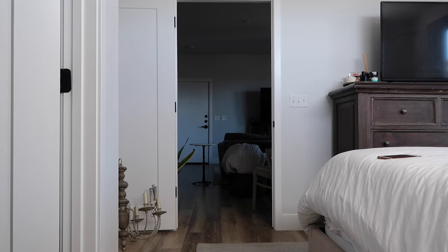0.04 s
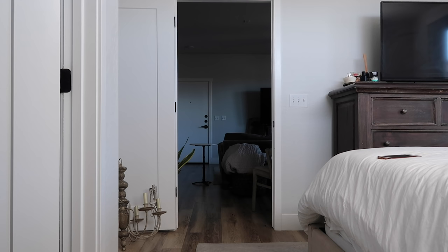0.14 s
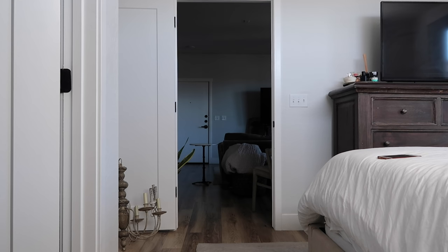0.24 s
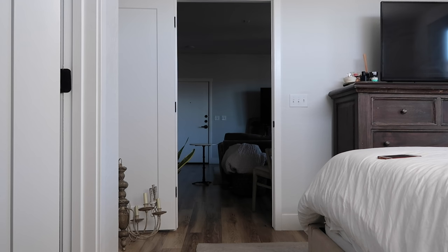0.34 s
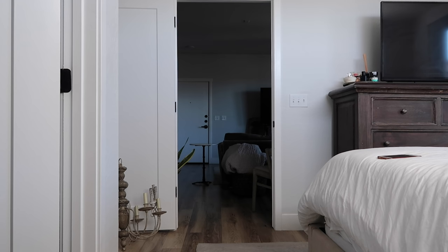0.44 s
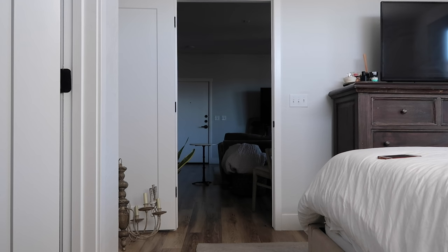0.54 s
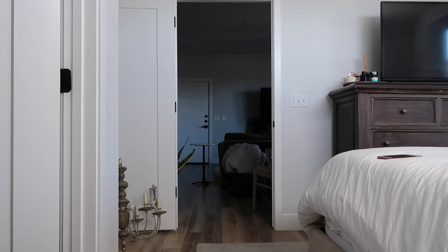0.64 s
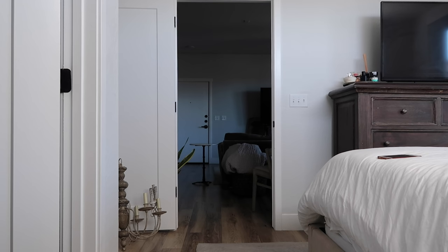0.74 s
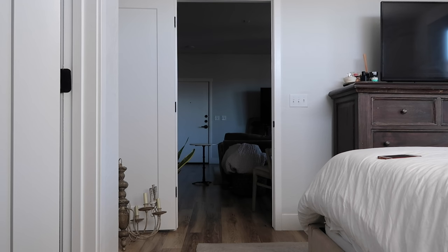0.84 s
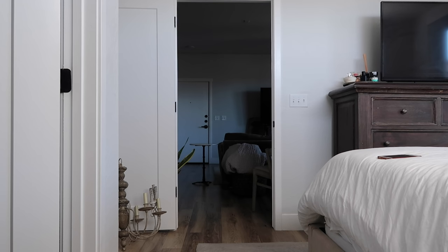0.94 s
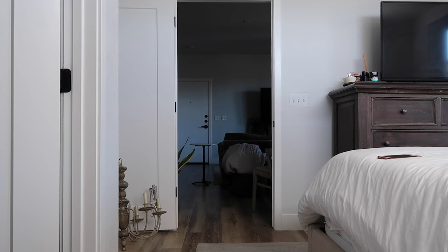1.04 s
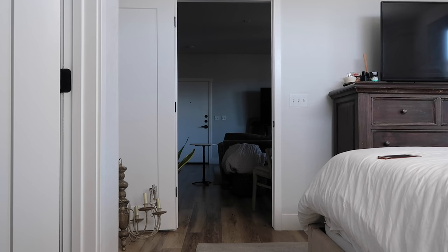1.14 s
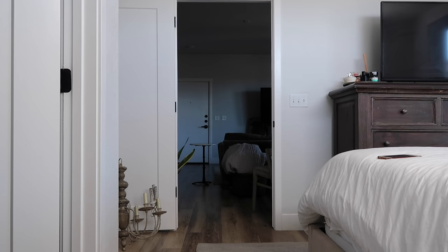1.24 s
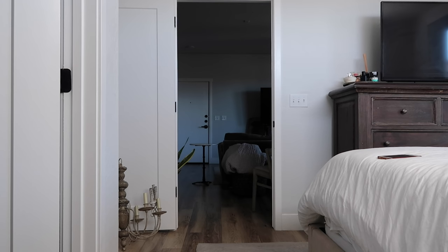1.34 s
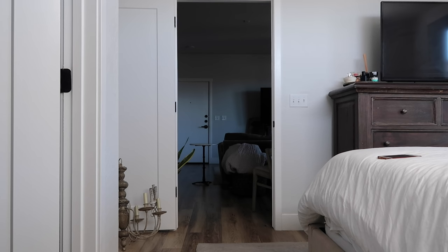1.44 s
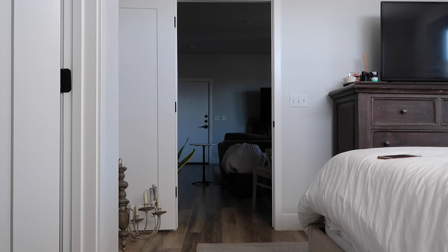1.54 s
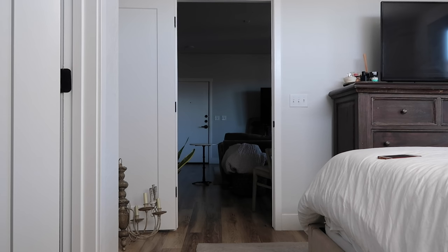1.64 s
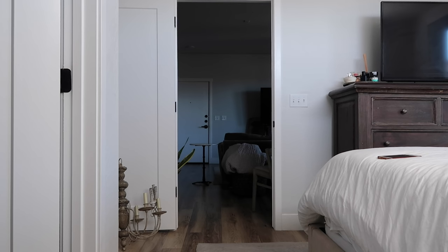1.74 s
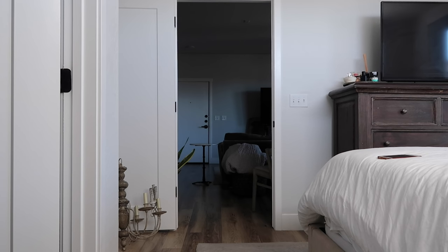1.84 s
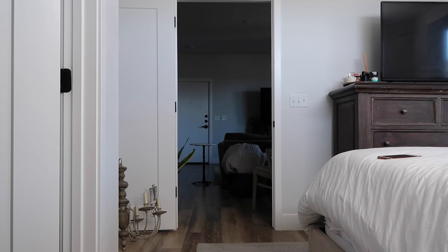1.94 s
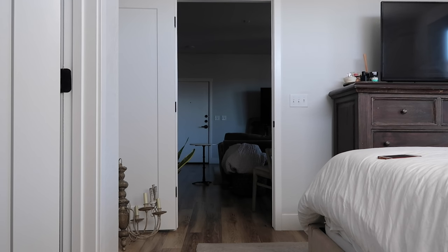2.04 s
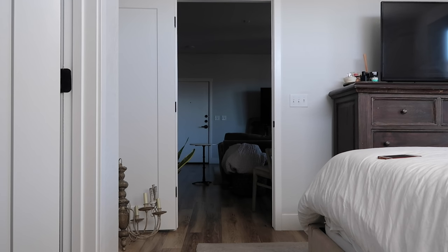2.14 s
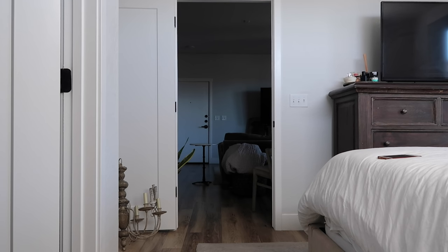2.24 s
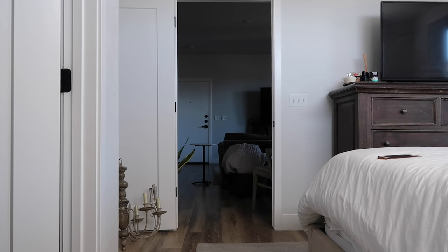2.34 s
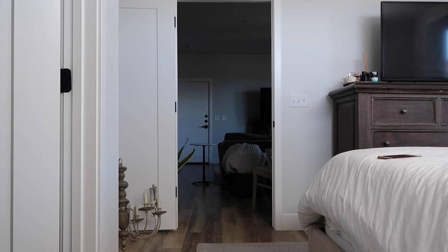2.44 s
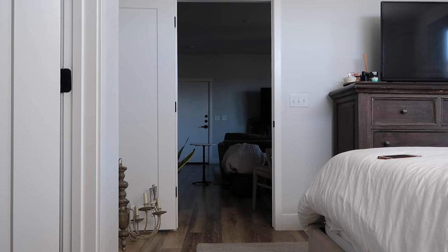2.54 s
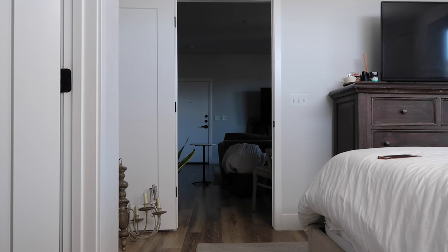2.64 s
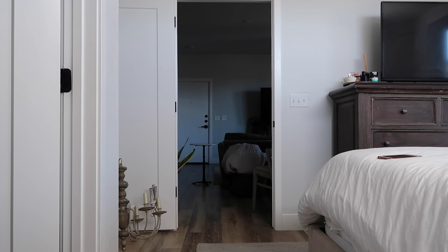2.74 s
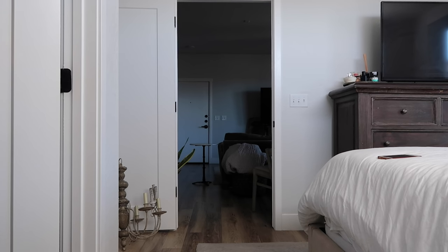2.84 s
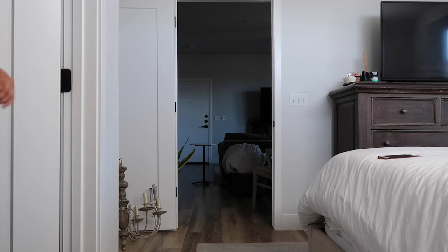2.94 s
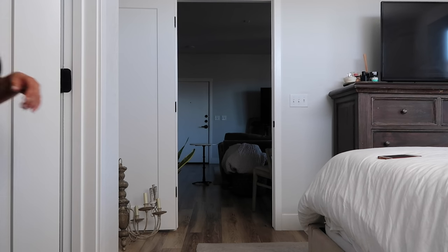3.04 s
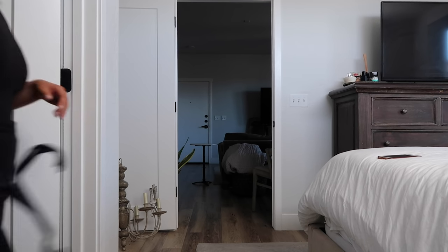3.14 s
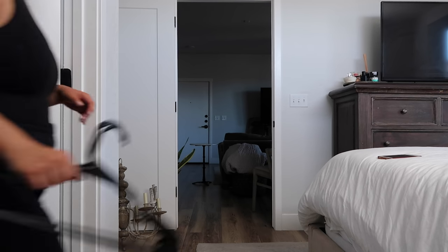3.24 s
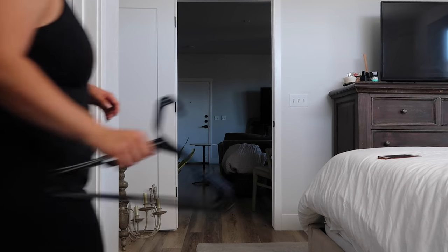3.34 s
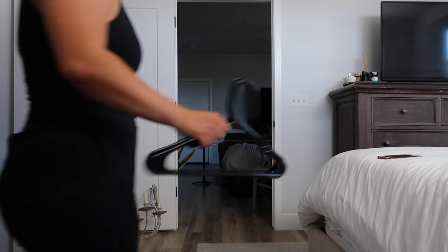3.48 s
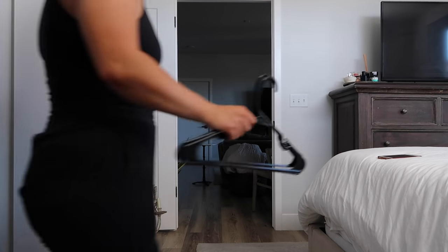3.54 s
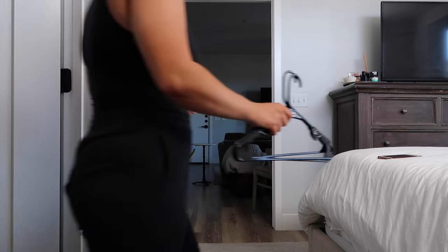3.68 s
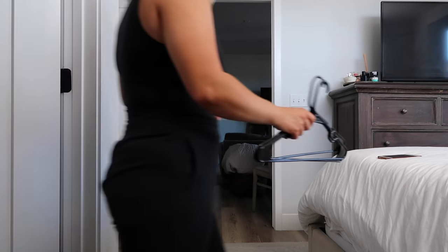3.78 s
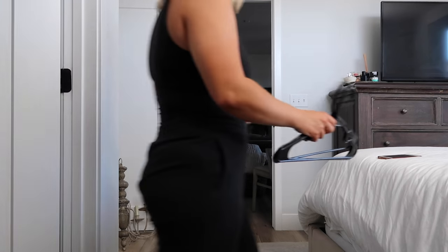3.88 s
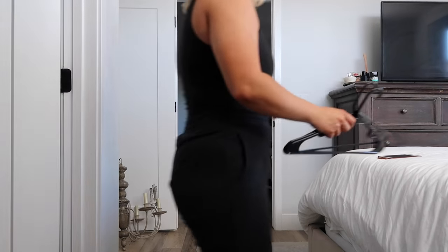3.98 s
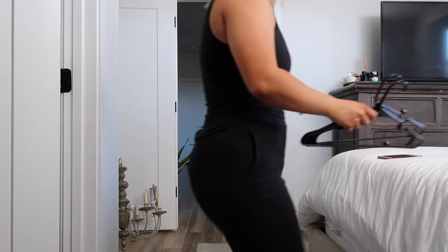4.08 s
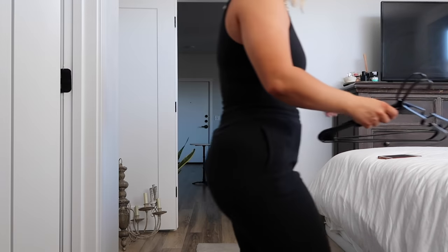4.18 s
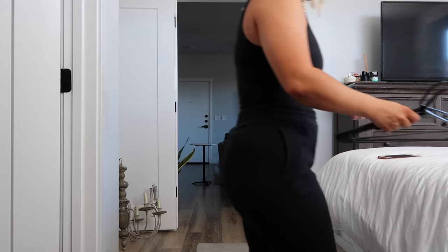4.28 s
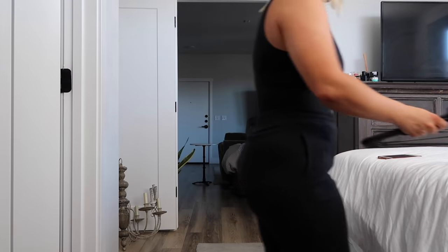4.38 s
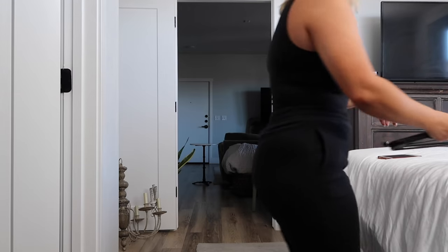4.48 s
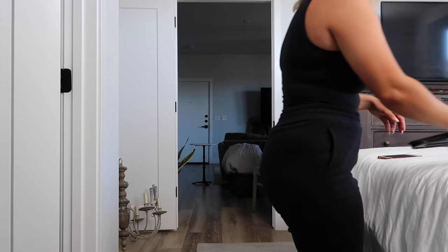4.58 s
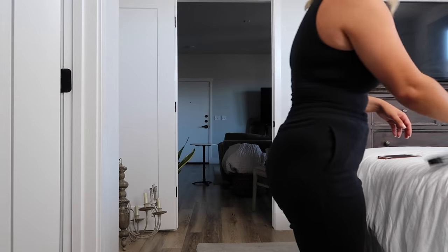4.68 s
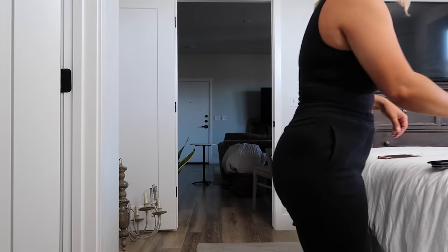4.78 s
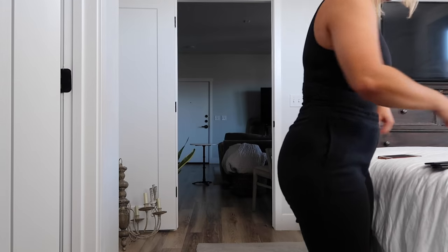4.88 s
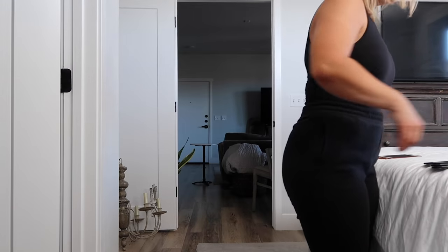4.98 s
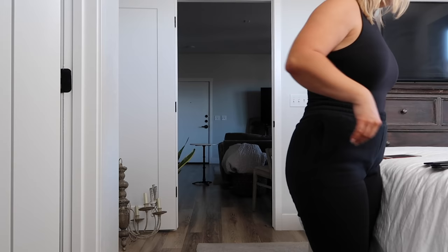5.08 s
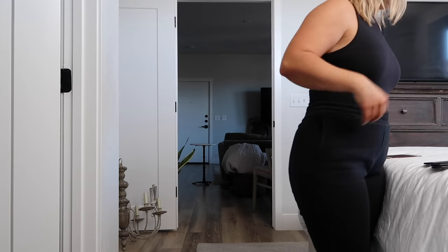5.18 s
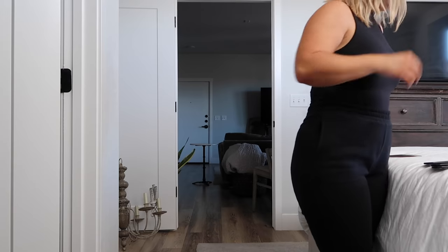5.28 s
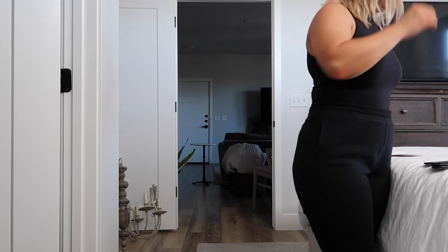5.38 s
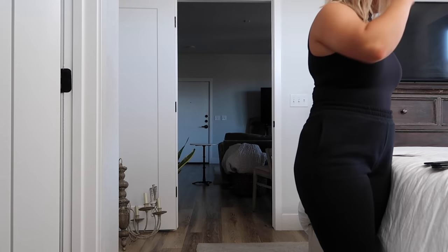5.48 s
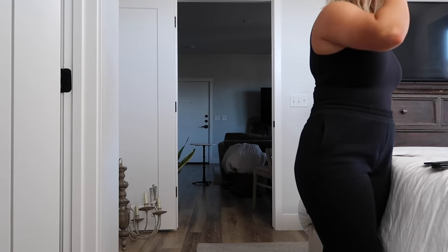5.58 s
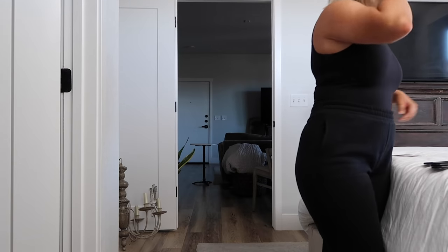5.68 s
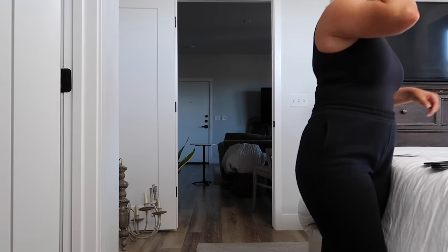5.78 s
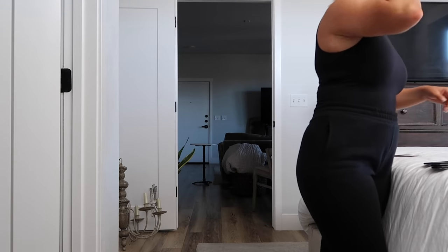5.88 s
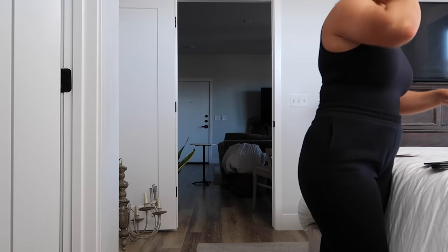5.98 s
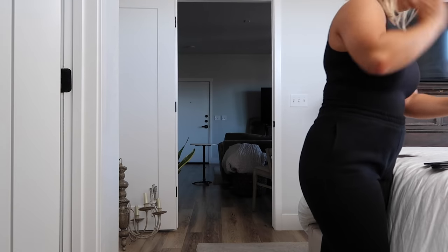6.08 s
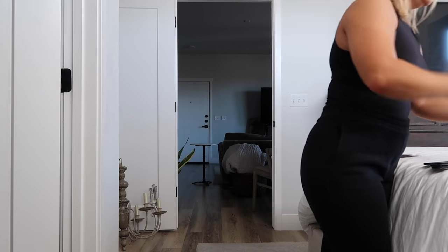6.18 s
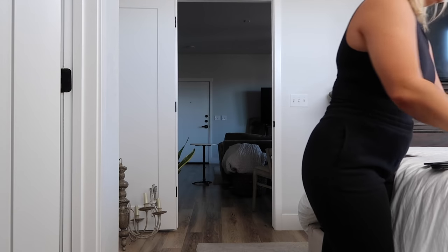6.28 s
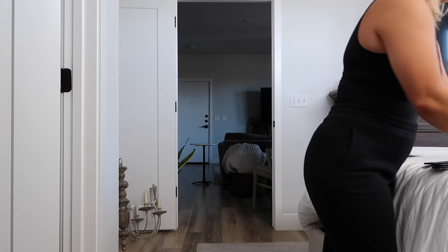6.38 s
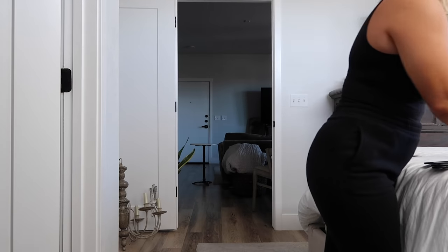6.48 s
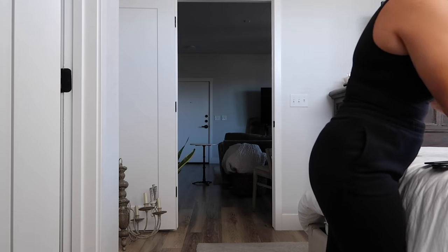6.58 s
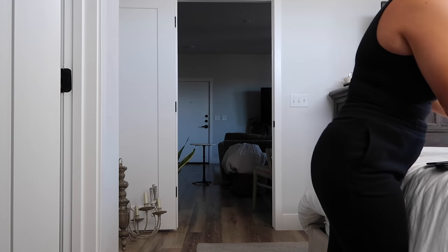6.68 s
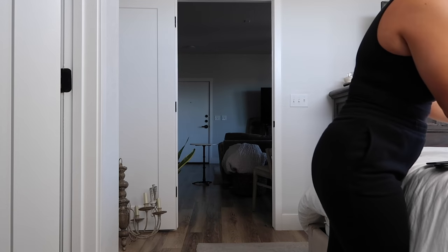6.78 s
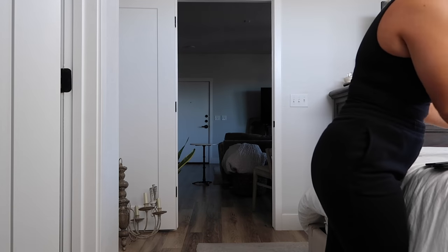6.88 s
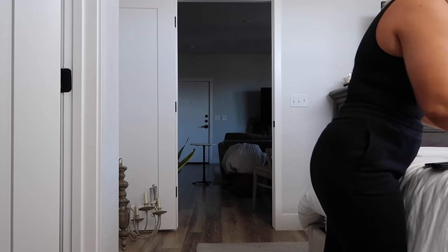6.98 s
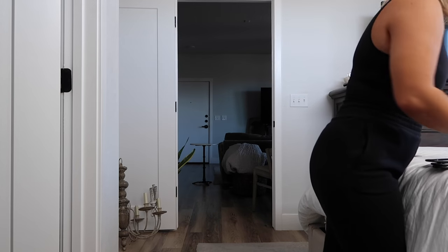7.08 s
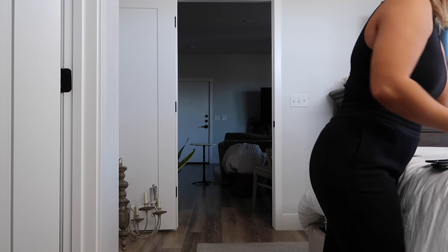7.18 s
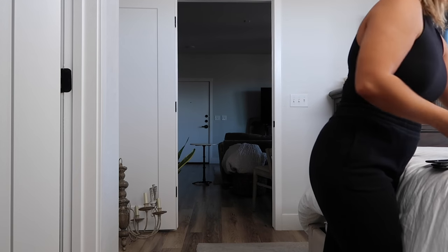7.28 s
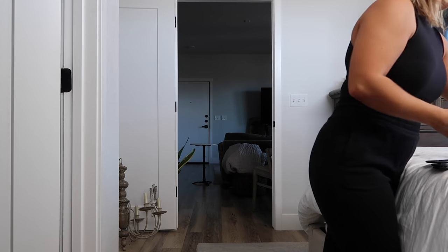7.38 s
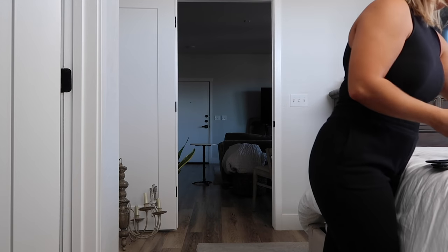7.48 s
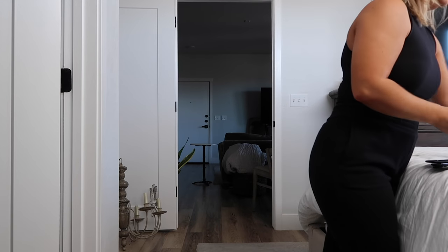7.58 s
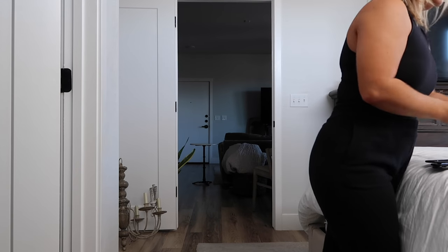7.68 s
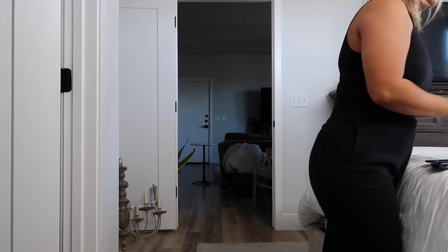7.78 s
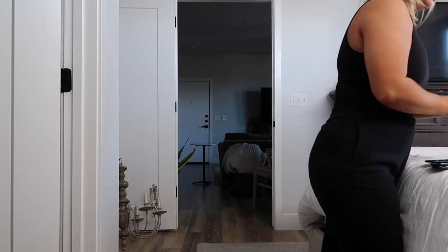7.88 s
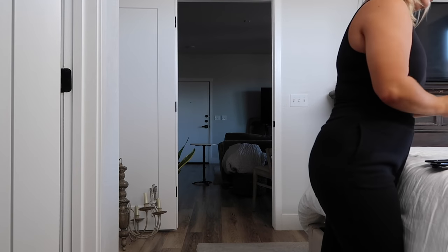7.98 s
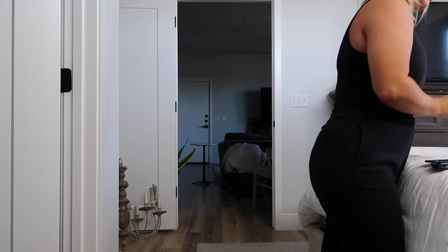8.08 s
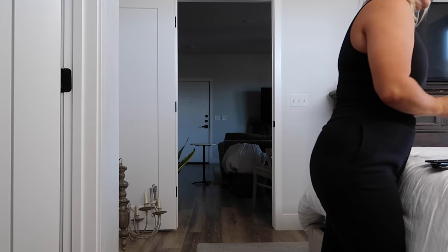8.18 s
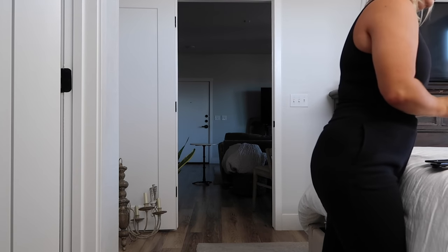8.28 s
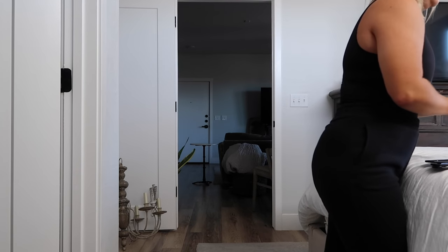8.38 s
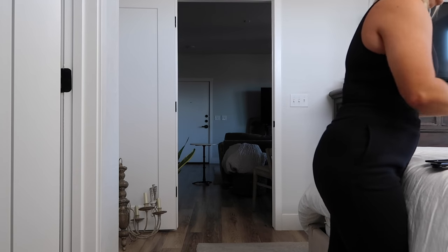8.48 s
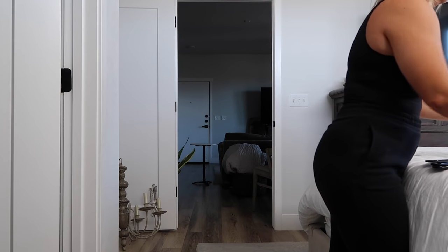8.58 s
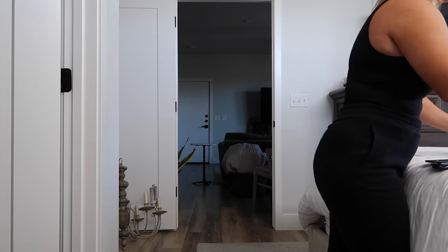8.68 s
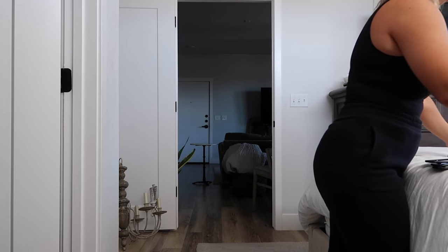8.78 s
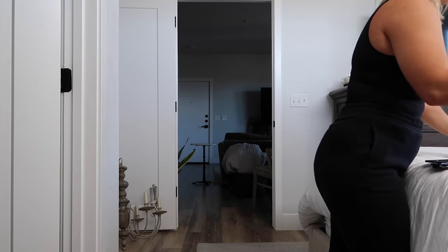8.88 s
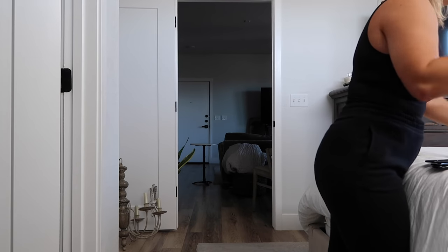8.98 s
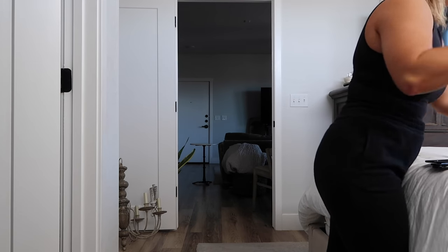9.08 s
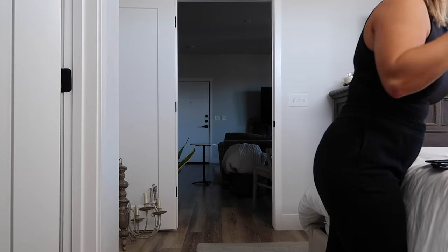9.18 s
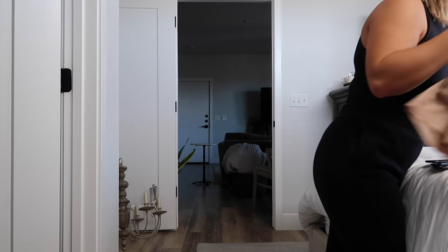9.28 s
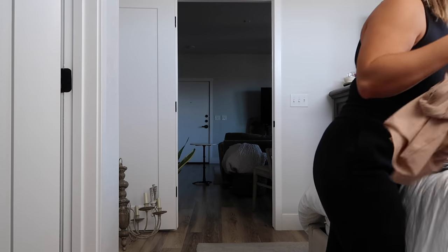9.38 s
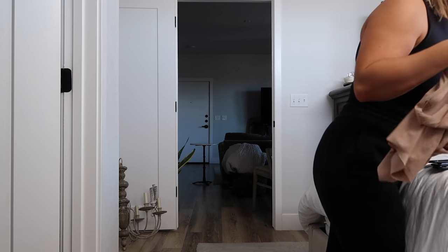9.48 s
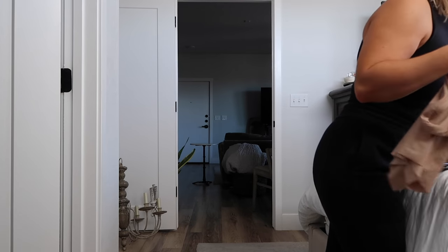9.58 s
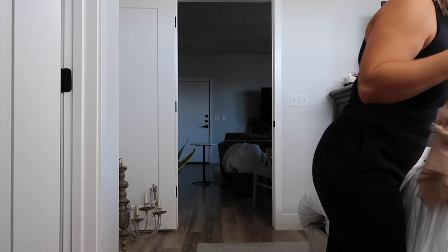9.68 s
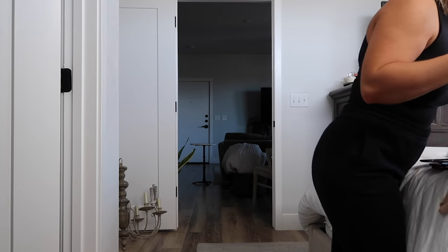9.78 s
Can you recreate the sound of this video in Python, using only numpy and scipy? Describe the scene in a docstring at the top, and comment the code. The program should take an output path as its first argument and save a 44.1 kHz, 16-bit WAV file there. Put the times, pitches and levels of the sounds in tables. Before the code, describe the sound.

A steady low mains hum fills a small bedroom. Wooden thumps come from a closet close by, then hooks scrape and tick along a rail. Two plastic hangers clack as they are lifted, faintly rustle while carried, and clatter onto a bed. Sparse light ticks follow, then one hanger snaps and rattles, and a small hard object is set down on wood. Close stereo microphone, short room reflections.

```python
"""A steady hum in a bedroom; bumps from a closet, then plastic hangers scrape along a rail, clack and tick.
They clatter down on a bed and are picked over; one snaps free and rattles; a small hard thing is set down.
Contacts are noise pushes ringing sets of resonances, friction is noise broken into bursts, and the hum is
wavering sines over filtered noise. Decaying stereo noise answers the contacts, the scrape and the rubs."""
import sys
import numpy as np
from scipy import signal
from scipy.fft import rfft, irfft, next_fast_len
from scipy.io import wavfile
from scipy.ndimage import map_coordinates

SR = 44100
rng = np.random.default_rng(int(sys.argv[2]) if len(sys.argv) > 2 else 0)


def store_wav(level_fs):
    """Save 16-bit WAV to argv[1]."""
    pcm = np.round(np.clip(np.atleast_2d(level_fs), -1, 1) * 32767)
    wavfile.write(sys.argv[1], SR, pcm.T.astype(np.int16))


N = 433503
TIME = np.arange(N) / SR  # s
RIGID_SPREAD, LOOSE_SPREAD, HOOK_SPREAD = .005, .03, .06  # pitch scatter between contacts, share of pitch

# resonances of the hangers in a bundle: (pitch [Hz], width [Hz], relative level [dB])
BUNDLE_MODES = [(1396, 56, 3.5), (1590, 110, -5.5), (1870, 78, -2.5), (2610, 130, 0.5), (3260, 97, -8.5),
                (4140, 72, 0), (4660, 160, -8), (5150, 54, -6), (5700, 150, -4.5), (7050, 290, -7)]
# resonances of a single hanger: (pitch [Hz], width [Hz], relative level [dB])
SINGLE_MODES = [(596, 240, -1.5), (973, 53, 0.5), (1596, 82, 2), (2110, 160, 0), (2590, 120, -4),
                (2850, 100, -0.5), (3410, 93, 4), (3860, 130, -1), (4640, 62, 5), (6100, 140, 2),
                (7900, 260, -2)]


def amp(db):
    """Decibels to gain."""
    return 10 ** (np.asarray(db) / 20)


def unit(x):
    """Scale to rms 1."""
    return x / np.sqrt(np.mean(np.abs(x) ** 2) + 1e-20)


def along(points, hz):
    """Interpolate (Hz, value) points on a log frequency axis."""
    f, v = np.transpose(points)
    return np.interp(np.log(hz + 1), np.log(f + 1), v)


def wobble(knots_per_s):
    """A smooth random curve through normally distributed knots."""
    knots = rng.standard_normal(int(N * knots_per_s / SR) + 4)
    return map_coordinates(knots, [TIME * knots_per_s])


def filtered(x, response):
    """Multiply the spectrum of x by a response of frequency."""
    n = x.shape[-1]
    size = next_fast_len(n + 8192)
    hz = np.fft.rfftfreq(size, 1 / SR)
    return irfft(rfft(x, size) * response(hz), size)[..., :n]


def causal(gain):
    """The minimum-phase response with this gain."""
    cepstrum = irfft(np.log(np.maximum(gain, 1e-6)))
    half = len(cepstrum) // 2
    cepstrum[1:half] *= 2
    cepstrum[half + 1:] = 0
    return np.exp(rfft(cepstrum))


def ringing(modes, hz, ring_db):
    """Gain of a body: resonance powers add to a flat base."""
    peaks = sum(amp(db + ring_db) ** 2 / (1 + (2 * (hz - centre_hz) / width_hz) ** 2)
                for centre_hz, width_hz, db in modes)
    return np.sqrt(1 + peaks)


def diffuse(n, alike, null_hz=6000, mono_hz=110):
    """Noise from all sides at two close ports: the same in the deep bass, unrelated in the treble."""
    def mid_side(hz):
        bass_share = 1 - (1 - np.clip(alike, 0, 1)) * hz ** 2 / (hz ** 2 + mono_hz ** 2)
        turn = np.arccos(bass_share * np.sinc(hz / null_hz)) / 2
        return np.array([np.cos(turn), np.sin(turn)])

    mid, side = filtered(rng.standard_normal((2, n)), mid_side)
    return np.array([mid + side, mid - side])


def room(early_db=6, early_t60_s=0.17, gap_s=0.0024):
    """A fresh stereo room answer of energy 1: fast early decay from near walls plus a longer tail."""
    # decay of the long tail: (frequency [Hz], t60 [s])
    tail_t60 = [(150, 1), (500, 0.49), (1500, 0.48), (4000, 0.54), (8000, 0.37), (15000, 0.018)]
    noise = diffuse(SR * 2 // 3, alike=0.98, null_hz=13000)
    hz, t, z = signal.stft(noise, SR, nperseg=256)
    fade = amp(-60 * t / along(tail_t60, hz)[:, None]) + amp(early_db - 60 * t / early_t60_s)
    tail = signal.istft(z * fade, SR, nperseg=256)[1]
    tail *= 1 - np.exp(-(np.arange(tail.shape[1]) / SR / gap_s) ** 2)
    return tail / np.sqrt(np.sum(tail ** 2) / 2)


def in_room(x, room_db):
    """A mono source plus the room's answer, at about unchanged power."""
    echo = signal.fftconvolve(x[None], room(), axes=1)[:, :N]
    return (x + amp(room_db) * echo) / np.hypot(1, amp(room_db))


def friction(rough_db, slips_per_s=350):
    """Stick and slip: noise broken into tiny bursts whose size the grip limits."""
    bursts = amp(rough_db * np.tanh(wobble(slips_per_s)))
    return unit(rng.standard_normal(N) * bursts)


def strike(s, gain, touch_s, side, room_db, rebound_db, size=32768, graze_s=0.008, graze_db=-21):
    """Parts graze, collide at time s and rebound; the push rings a body, wakes the room and reaches two ports."""
    rebound_s = .0085  # delay of the second meeting
    opposed_hz, port_turns, port_bend = 6900, 0.39, 1.8  # ports agree in the bass, drift apart in the treble
    lead = SR // 40  # samples kept ahead of the collision for the graze
    hz = np.fft.rfftfreq(size, 1 / SR)
    t = (np.arange(size) - lead) / SR
    graze = amp(graze_db) * np.exp(-np.abs(t) / graze_s)
    force = np.where(t < 0, graze, np.exp(-np.abs(t) / touch_s))
    force += amp(rebound_db) * (t > rebound_s) * np.exp(-np.abs(t - rebound_s) / touch_s)
    push = rfft(rng.standard_normal(size) * force)
    push /= causal(np.abs(push)) ** .5  # evens out the pitches
    apart = side * port_turns * np.minimum(hz / opposed_hz, 1) ** port_bend  # side > 0: left leads
    ports = np.exp(1j * np.pi * apart * np.array([[1], [-1]]))
    delayed_room = np.pad(room(), ((0, 0), (lead, 0)))
    echo = amp(room_db) * rfft(delayed_room, size)
    hit = irfft(unit(causal(gain(hz))) * (unit(push) + echo) * ports)
    start = round(s * SR) - lead
    return np.pad(hit[:, :SR * 2 // 3], ((0, 0), (start, N)))[:, :N]


def contacts(table, modes, spread, colour, ring_db, soft_above_hz, **blow):
    """Blows on like bodies: each wakes the resonances at new strengths and slightly new pitches."""
    out = np.zeros((2, N))
    for s, db, hardness in table:
        chance = rng.standard_normal((len(modes), 2))
        woken = [(centre_hz * (1 + spread * a), width_hz, level + 3 * b)
                 for (centre_hz, width_hz, level), (a, b) in zip(modes, chance)]

        def gain(hz):
            tilt_db = hardness * np.log2(np.maximum(hz / soft_above_hz, 1))  # harder is brighter
            return amp(along(colour, hz) + tilt_db) * ringing(woken, hz, ring_db)

        out += amp(db) * strike(s, gain, **blow)
    return out


def hum(mains_db=-33.0, air_db=-50, drift_rad=0.17):
    """A mains hum beats against a motor tone just under it, among other motor tones and soft moving air."""
    mains_hz = 120
    # motor tones: (pitch [Hz], level before dips [dB rms], dip depth at a unit wobble [dB])
    motor_tones = [(57.6, -52, 5), (61.8, -54.5, 13), (114.5, -65, 12), (222.6, -61, 12), (396.5, -59, 22),
                   (13000, -80, 0.5)]
    # spectrum of moving air: (frequency [Hz], relative level [dB per Hz])
    air_spectrum = [(15, -9.5), (35, -1), (55, -4), (80, -3), (165, 2), (260, 0), (420, 0), (650, -7.5),
                    (1100, -11), (2600, -15.5), (5000, -23), (9900, -31.5), (12400, -36), (14500, -80)]
    waver_db = 0.16 * wobble(10.0) + 0.54 * wobble(30)
    tones = amp(mains_db + waver_db) * np.sin(2 * np.pi * mains_hz * TIME)
    for hz, db, depth_db in motor_tones:
        dips = amp(-abs(depth_db) * wobble(5.4) ** 2)  # mostly level, with brief sags
        tones += amp(db) * dips * np.sin(2 * np.pi * hz * TIME + drift_rad * wobble(4.6))
    air = unit(filtered(diffuse(N, alike=0.53), lambda hz: amp(along(air_spectrum, hz))))
    return np.sqrt(2) * tones + amp(air_db) * air


def rubs(soft_hz=9000, swing_db=4):
    """Strokes of cloth and plastic swell and fade; a faint uneven rustle is heard as hangers are carried."""
    rub_s, rub_octaves = 0.089, 0.73  # half length and half width of a stroke
    rustle_from_s, rustle_to_s, rustle_db, rustle_hz = 2.3, 4.7, -62.5, 2400
    # strokes: (time [s], level [dB], centre [Hz])
    strokes = [(0, -46.5, 500), (1.0, -53.5, 2020), (2.22, -54, 800), (2.74, -57, 2860), (3.2, -55, 3680),
               (3.553, -51.5, 2880), (3.84, -56.5, 1790), (4.018, -48, 1860), (4.42, -54.5, 1640),
               (5.39, -57.5, 2430), (7.091, -49.5, 2340), (8.5, -56, 2070), (8.83, -55, 586)]

    def band(centre_hz):
        return lambda hz: (1 / (1 + (np.log2((hz + 1) / centre_hz) / rub_octaves) ** 2)
                           / (1 + (hz / soft_hz) ** 4))

    grain = friction(rough_db=13)
    carried = np.clip(np.minimum(TIME - rustle_from_s, rustle_to_s - TIME) / rub_s + 1, 0, 1)
    rustle = unit(filtered(grain, band(rustle_hz)))
    out = carried * amp(rustle_db + swing_db * wobble(7.5)) * rustle
    for s, db, centre_hz in strokes:
        near = np.abs(TIME - s) < 2 * rub_s
        swell = np.exp(-2 * ((TIME[near] - s) / rub_s) ** 2)
        out[near] += amp(db) * unit(filtered(grain[near], band(centre_hz))) * swell
    return in_room(out, room_db=-0.5)


def knocks():
    """Furniture and floor are knocked: long soft touches ring low wooden resonances."""
    # knocks: (time [s], relative level [dB], hardness [dB/octave])
    blows = [(.072, -33, -12), (.642, -13, -0.5), (.646, -13.5, -1), (.651, -11, 0), (.664, -17, 0),
             (.676, -31, 7.5), (.685, -22, -4), (.712, -33, 4.5), (.735, -24.5, -3.5), (1.266, -30.5, -10),
             (2.087, -33.5, 0.5), (2.181, -29.5, 0.5), (2.215, -25.5, -2.5), (3.798, -27.5, 4.5),
             (3.822, -27.5, 1.5), (3.996, -35, 4), (4.133, -38, -6), (4.152, -38, -8), (4.398, -30.5, -12),
             (7.505, -31, -11.5)]
    # wood resonances: (pitch [Hz], width [Hz], relative level [dB])
    modes = [(212, 48, -7), (397, 42, 4.5), (788, 32, -1.5), (1070, 30, -1), (1280, 50, -6.5),
             (1480, 68, -7), (1800, 125, -1), (2370, 190, 3), (2820, 300, -3.5), (3350, 76, 1),
             (3950, 160, -1.5)]
    # colour at zero hardness: (frequency [Hz], level [dB])
    colour = [(40, -4), (170, 10), (270, 1.5), (520, 8.5), (1450, 5.5), (3300, -9.5), (7000, -24),
              (13000, -54)]
    return amp(14.0) * contacts(blows, modes, RIGID_SPREAD, colour, ring_db=8.5, soft_above_hz=580,
                                touch_s=0.011, side=0.94, room_db=1.0, rebound_db=-21.0)


def set_down():
    """A small hard thing meets the dresser and rings its top."""
    # contacts: (time [s], relative level [dB], hardness [dB/octave])
    blows = [(9.451, -24, 3), (9.459, -11.5, 3), (9.466, -43, 5), (9.529, -24.5, -4)]
    # dresser resonances: (pitch [Hz], width [Hz], relative level [dB])
    modes = [(427, 43, 7.5), (730, 150, -3), (1304, 86, 5), (1770, 58, -4), (2080, 96, 2.5), (2260, 48, 2),
             (2730, 130, 0.5), (3110, 76, 1), (3920, 100, -7), (5340, 98, -7.5), (5920, 70, -5)]
    # colour at zero hardness: (frequency [Hz], level [dB])
    colour = [(40, -23), (400, -0.5), (2500, -4.5), (3800, -11.5), (6200, -14.5), (14000, -40)]
    return amp(14.0) * contacts(blows, modes, RIGID_SPREAD, colour, ring_db=12, soft_above_hz=1150,
                                touch_s=0.0022, side=0.9, room_db=-3.0, rebound_db=-14.5)


def slide(scrape_db=-6.0, groan_db=-2, groan_hz=255, groan_width_hz=45):
    """Hooks grate along the rail, which groans at its low bending pitch."""
    attack_s, release_s = 0.015, 0.089
    scrape_db_per_s, groan_db_per_s = -2, -12  # both ease during a push
    # pushes: (start [s], length [s], relative scrape at the end [dB], relative groan midway [dB])
    pushes = [(1.7, 0.15, -35.5, -40.5), (2.09, 0.16, -45, -42)]
    # spectrum of the scrape: (frequency [Hz], relative level [dB per Hz])
    scrape_spectrum = [(180, -18), (500, -3), (1100, -11.5), (1900, -6), (2600, -8), (4200, -4.5),
                       (5200, -14.5), (9000, -24.5), (13500, -57), (15500, -63)]
    scrape, groan = np.zeros((2, N))
    for start, length, push_scrape_db, push_groan_db in pushes:
        t = TIME - start
        held = np.clip(t, 0, length)
        push = np.clip(t / attack_s, 0, 1) * np.exp(-np.maximum(t - length, 0) / release_s)
        scrape += push * amp(push_scrape_db + scrape_db_per_s * (held - length))
        groan += push * amp(push_groan_db + groan_db_per_s * (held - length / 2))
    grate = unit(filtered(friction(rough_db=23, slips_per_s=260),
                          lambda hz: amp(along(scrape_spectrum, hz))))
    bend = unit(filtered(friction(rough_db=-3.5),
                         lambda hz: 1 / (1 + 2j * (hz - groan_hz) / groan_width_hz) ** 2))
    return in_room(amp(scrape_db) * scrape * grate, room_db=7) + amp(groan_db) * groan * bend


def hook_catches():
    """Hooks catch on the rail, each contact ringing it at scattered pitches."""
    # catches: (time [s], relative level [dB], hardness [dB/octave])
    blows = [(1.717, -20, 5), (1.731, -24.5, 6), (1.761, -27, 5), (1.773, -24.5, 2), (1.795, -20, 0),
             (1.806, -15, -6), (1.815, -8.5, -1.5), (1.829, -13, 0), (1.835, -12.5, -1.5), (1.847, -21, 3),
             (1.861, -16, -3), (1.881, -17, 1.5), (1.898, -17, 0), (1.913, -22, -6), (1.922, -16, -8),
             (1.932, -25, 1), (1.941, -26, 2.5), (1.957, -24, -11), (2.171, -31, -4), (2.186, -30, -6),
             (2.222, -27.5, -9)]
    # rail resonances: (pitch [Hz], width [Hz], relative level [dB])
    modes = [(2520, 200, 0.5), (2810, 87, 7), (3440, 220, 1.5), (4100, 114, 6), (7200, 270, -8),
             (9300, 240, -5)]
    # colour at zero hardness: (frequency [Hz], level [dB])
    colour = [(40, -38), (170, -20.5), (520, -29.5), (1450, -22), (3300, -24), (7000, -18.5), (13000, -36),
              (16000, -54)]
    return amp(9.5) * contacts(blows, modes, HOOK_SPREAD, colour, ring_db=12.0, soft_above_hz=3400,
                               touch_s=0.0011, side=1.0, room_db=1, rebound_db=-29)


def taps(skirt=0.41, soft_hz=9500):
    """A glancing touch rings mostly one mode; a firm touch damps it, a lighter one leaves it sharper."""
    firm_db, firm_q, db_per_q_doubling = -9.5, 12, 12.5
    # light taps: (time [s], relative level [dB], pitch [Hz])
    touches = [(2.215, -13, 802), (2.305, -32.5, 3180), (2.670, -36.5, 4300), (2.808, -32.5, 4300),
               (4.004, -25, 1960), (4.252, -28, 4270), (4.821, -16, 2720), (4.83, -21, 2680),
               (4.840, -18, 2890), (4.862, 1.5, 1670), (4.87, -5, 4420), (4.886, -12, 2600),
               (4.897, -11, 1970), (4.993, -12.5, 6400), (5.001, -12.5, 1456), (6.092, -33, 4160),
               (6.616, -21.5, 1440), (6.898, -24, 1330), (6.920, -36.5, 4300), (7.030, -38, 2350),
               (7.061, -31, 1445)]
    out = np.zeros((2, N))
    for s, db, centre_hz in touches:
        q = firm_q * 2 ** ((firm_db - db) / db_per_q_doubling)

        def gain(hz):
            detune = (hz + 1) / centre_hz - centre_hz / (hz + 1)
            return (1 + (q * detune) ** 2) ** -skirt / (1 + (hz / soft_hz) ** 4)

        out += amp(db) * strike(s, gain, touch_s=0.0021, side=0.84, room_db=0.5, rebound_db=-19.5)
    return amp(8.5) * out


def lifted_pair():
    """Two hangers clack as they are lifted out, each ringing its own resonances."""
    # clacks: (time [s], relative level [dB], hardness [dB/octave], which hanger)
    clacks = [(3.008, -25, 7, "first"), (3.014, -17, -1, "first"), (3.023, -17.5, 6.5, "first"),
              (3.073, -21.5, -4, "first"), (3.122, -14, 7.5, "second"), (3.138, -19.5, -5, "second"),
              (3.155, -24, -21, "second")]
    # resonances by hanger: (pitch [Hz], width [Hz], relative level [dB])
    pair_modes = {"first": [(2520, 370, 5.5), (3320, 210, 6.5), (3660, 110, -3), (5060, 150, 1),
                  (6400, 250, -2)], "second": [(2370, 200, -4), (3920, 170, 6), (4240, 100, 2),
                  (4830, 200, 6), (7400, 500, -0.5)]}
    # colour at zero hardness: (frequency [Hz], level [dB])
    colour = [(100, 1), (700, -4.5), (3000, -5), (5000, -6), (9000, -14), (16000, -34)]
    out = np.zeros((2, N))
    for *blow, which in clacks:
        out += contacts([blow], pair_modes[which], RIGID_SPREAD, colour, ring_db=17, soft_above_hz=2100,
                        touch_s=0.0015, side=1.0, room_db=0, rebound_db=-13)
    return amp(8.5) * out


def snapping_hanger():
    """One hanger snaps free with a very short push, then rattles to rest on the same resonances."""
    # snap and rattle: (time [s], relative level [dB], hardness [dB/octave])
    snap_blows = [(7.853, -4, 0)]
    rattle_blows = [(7.886, -12.5, 4), (7.900, -13, -6.5), (7.904, -13, -2.5), (7.920, -7, -2.5),
                    (7.928, -20.5, -1), (7.944, -17, -4), (7.961, -21, 0), (8.107, -33.5, -3.5)]
    # colours at zero hardness: (frequency [Hz], level [dB])
    snap_colour = [(170, -52), (1000, -39.5), (2000, -26.5), (2650, -16), (3400, -15.5), (3950, -35),
                   (6000, -32.5), (16000, -59)]
    rattle_colour = [(40, -44), (170, -30), (520, -11), (1450, -6.5), (3300, -5), (7000, -13.5),
                     (14000, -33)]
    snap = contacts(snap_blows, SINGLE_MODES, RIGID_SPREAD, snap_colour, ring_db=5.5, soft_above_hz=1400,
                    touch_s=0.00052, side=-1.1, room_db=-4.0, rebound_db=-4, graze_db=-39)
    rattle = contacts(rattle_blows, SINGLE_MODES, RIGID_SPREAD, rattle_colour, ring_db=11, soft_above_hz=580,
                      touch_s=0.00079, side=-0.98, room_db=-4.5, rebound_db=-6.0)
    return amp(14.0) * (snap + rattle) * amp([[-.7], [.7]])  # a little to the right


def hanger_bundle():
    """Loose hangers clatter on the bed and ring; gripped ones tick, their resonances held down."""
    # loose and gripped contacts: (time [s], relative level [dB], hardness [dB/octave])
    loose_blows = [(4.751, -33, -5), (4.758, -23.5, 5.5), (4.831, -16.5, 5), (4.839, -13.5, 4.5),
                   (4.852, -12, 9), (4.860, -9, -2), (4.863, -7, -18.5), (4.869, -11, 4), (4.877, -5, 8),
                   (4.881, -6.5, 6), (4.889, -12, 0), (4.994, -13, 7)]
    gripped_blows = [(4.005, -38, 21), (4.132, -22.5, -4.5), (4.142, -23.5, -2.5), (6.705, -31, -6.5),
                     (7.181, -22, 2.5)]
    # colour at zero hardness: (frequency [Hz], level [dB])
    colour = [(40, -42), (170, -4), (520, -5.5), (1450, -9.5), (3300, -7.5), (7000, -8.5), (13300, -17.5),
              (16000, -51)]
    loose = contacts(loose_blows, BUNDLE_MODES, LOOSE_SPREAD, colour, ring_db=15.5, soft_above_hz=2000,
                     touch_s=0.0011, side=0.91, room_db=-3.5, rebound_db=-23.0)
    gripped = contacts(gripped_blows, BUNDLE_MODES, LOOSE_SPREAD, colour, ring_db=-3, soft_above_hz=2340,
                       touch_s=0.0038, side=0.71, room_db=-2, rebound_db=-5)
    return amp(14.0) * loose + amp(8.5) * gripped


def scene():
    """All sources at the two ports."""
    background = hum() + rubs() + knocks() + set_down()
    closet = slide() + hook_catches()
    return background + closet + taps() + lifted_pair() + snapping_hanger() + hanger_bundle()


def record(dry, knee_db=-21, release_s=0.17, top_hz=15700):
    """Gain falls as the smoothed power nears and passes the knee; nothing is kept above the band limit."""
    step = 1 / (release_s * SR)
    power = signal.lfilter([step], [1, step - 1], np.mean(dry ** 2, axis=0))
    gain = 1 / np.sqrt(1 + (power / amp(knee_db) ** 2) ** 2)
    return filtered(dry * gain, lambda hz: hz < top_hz)


dry = scene()
out = record(dry)
store_wav(out)
```